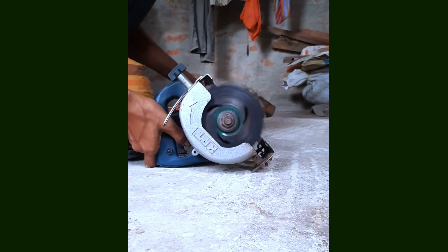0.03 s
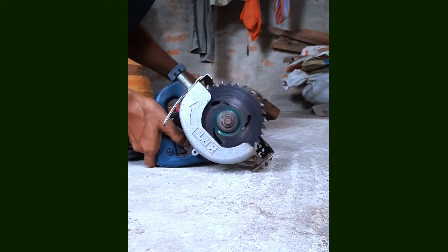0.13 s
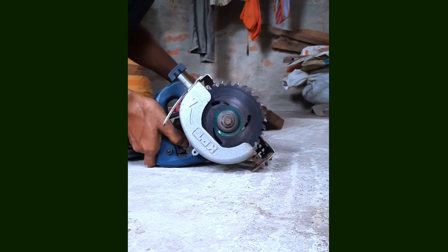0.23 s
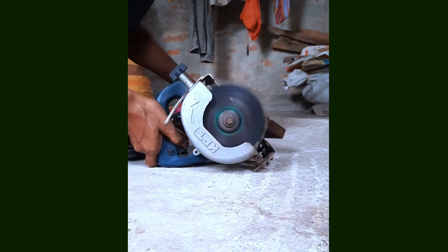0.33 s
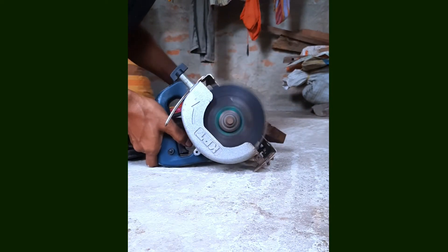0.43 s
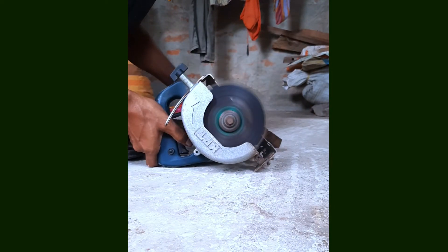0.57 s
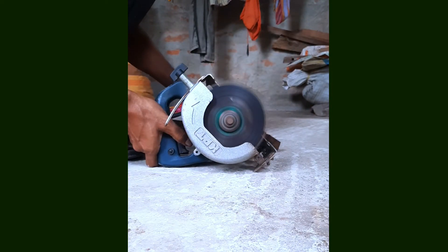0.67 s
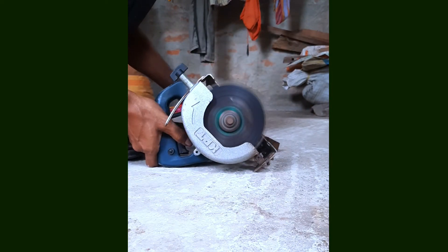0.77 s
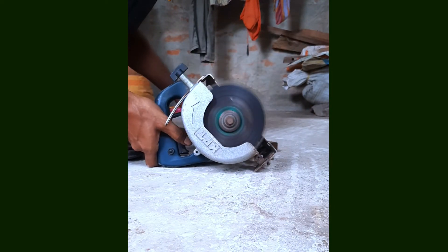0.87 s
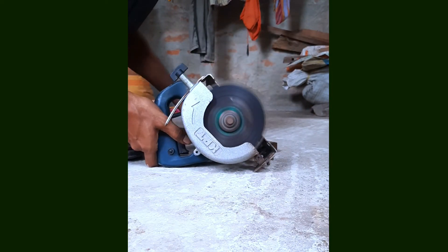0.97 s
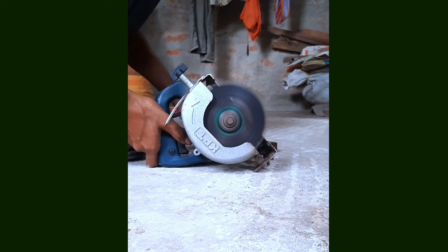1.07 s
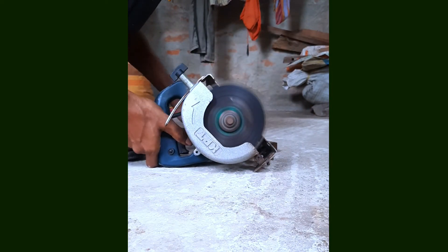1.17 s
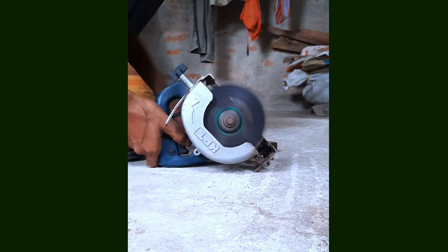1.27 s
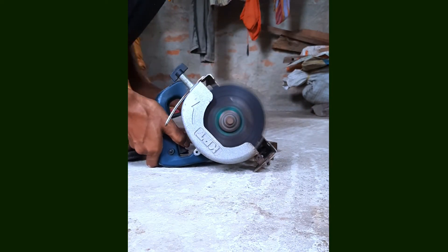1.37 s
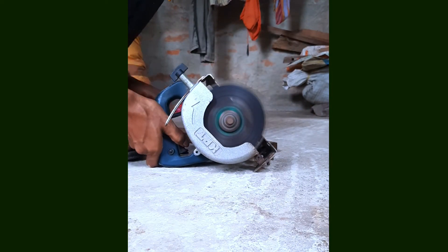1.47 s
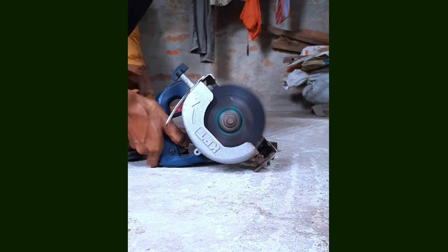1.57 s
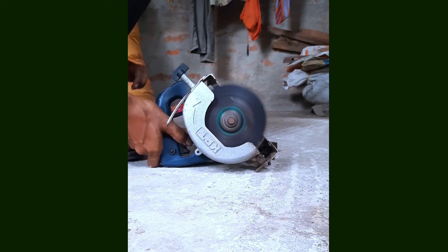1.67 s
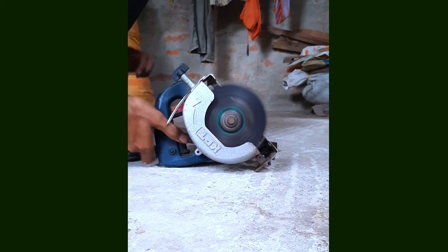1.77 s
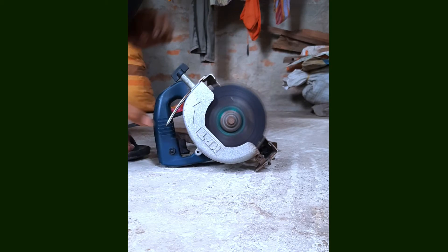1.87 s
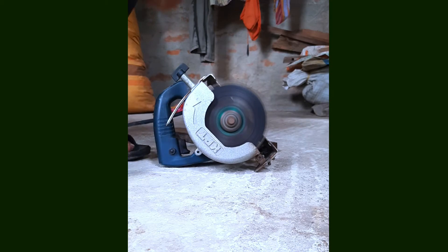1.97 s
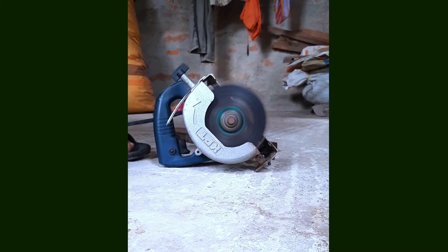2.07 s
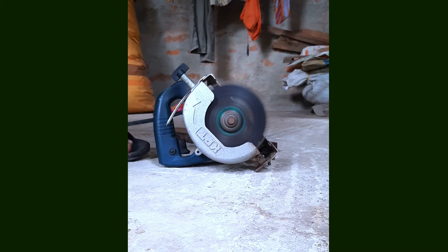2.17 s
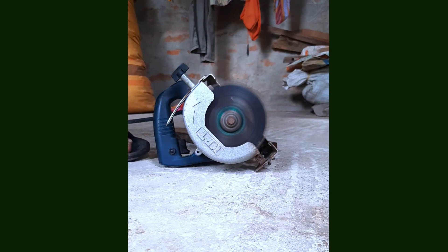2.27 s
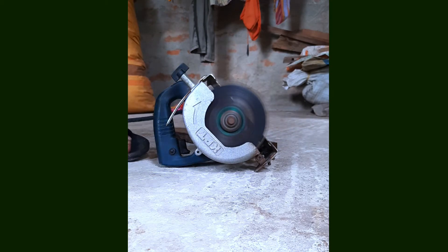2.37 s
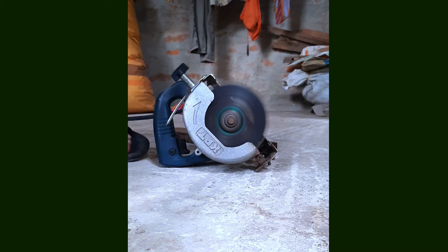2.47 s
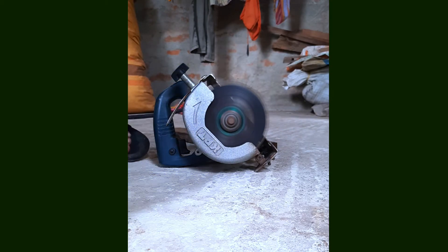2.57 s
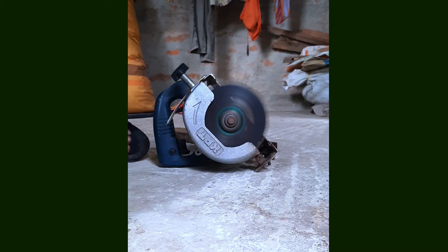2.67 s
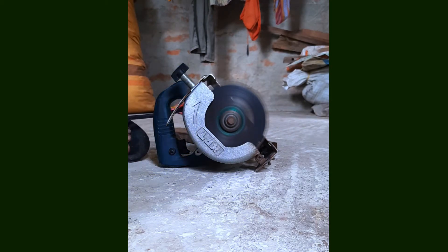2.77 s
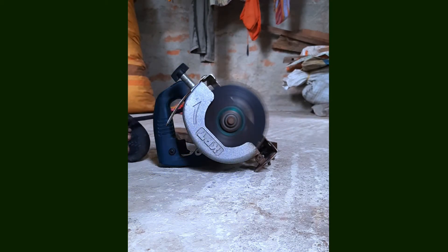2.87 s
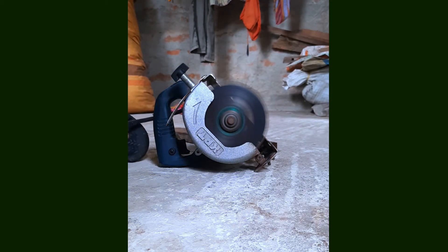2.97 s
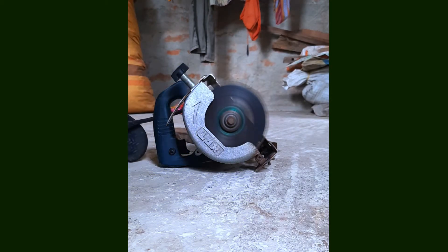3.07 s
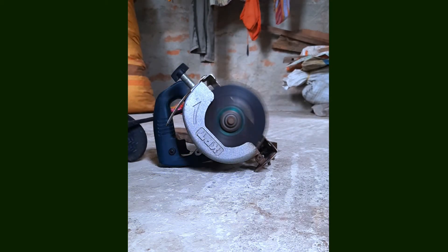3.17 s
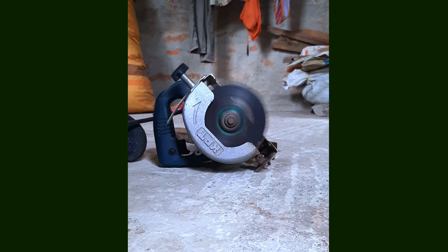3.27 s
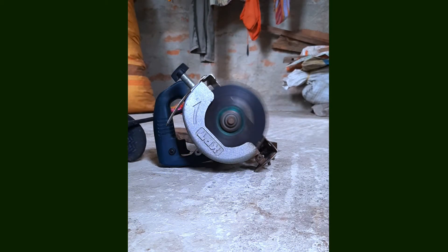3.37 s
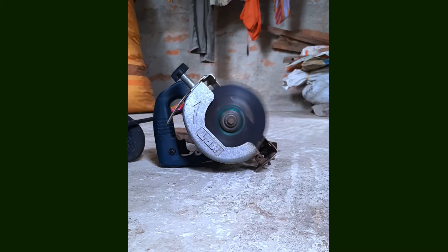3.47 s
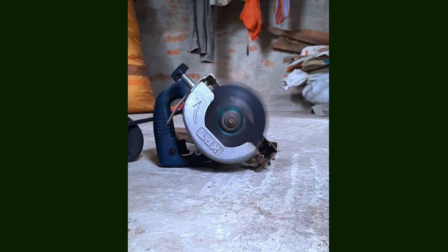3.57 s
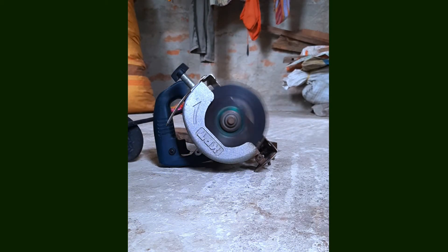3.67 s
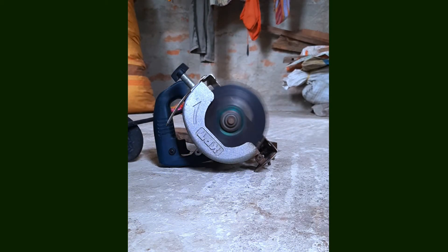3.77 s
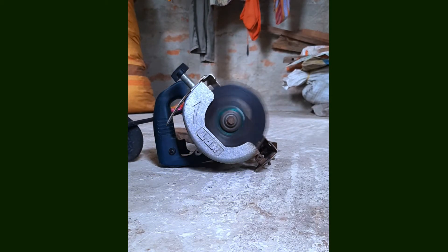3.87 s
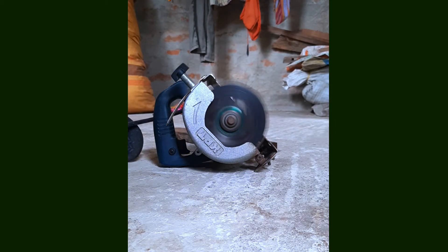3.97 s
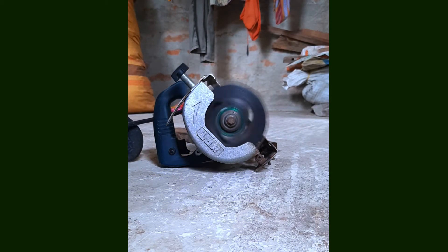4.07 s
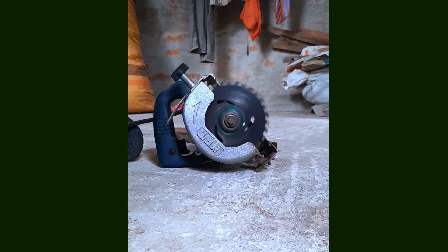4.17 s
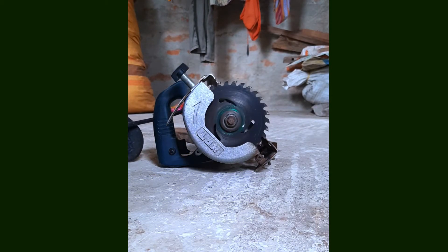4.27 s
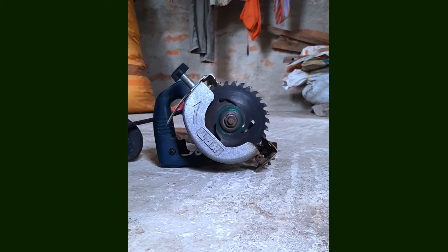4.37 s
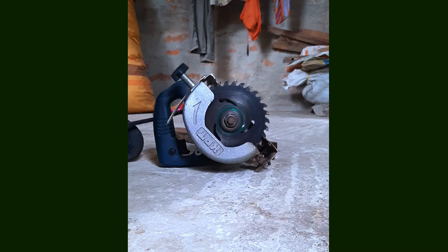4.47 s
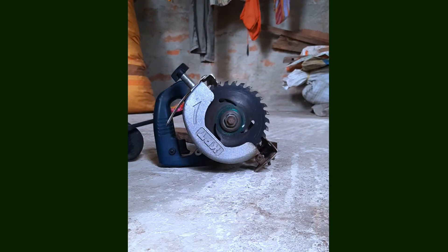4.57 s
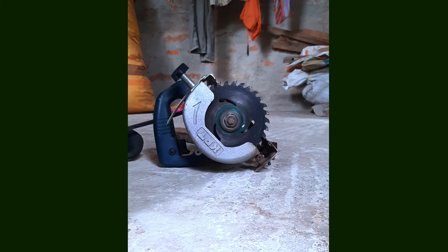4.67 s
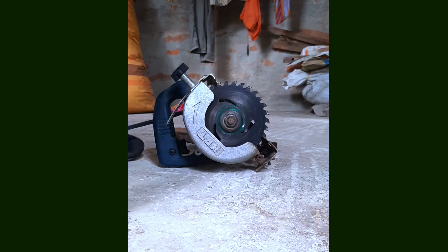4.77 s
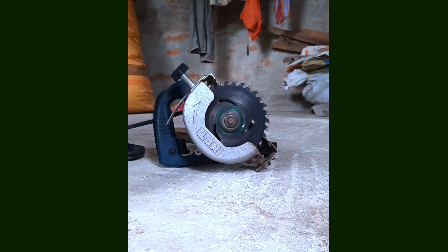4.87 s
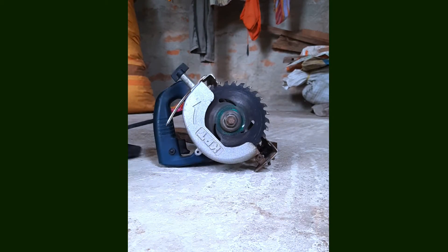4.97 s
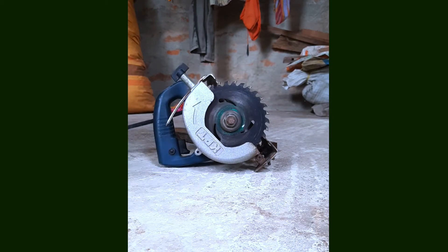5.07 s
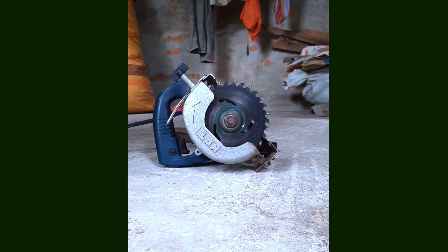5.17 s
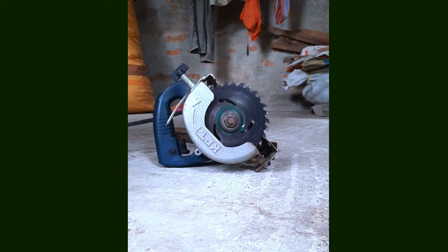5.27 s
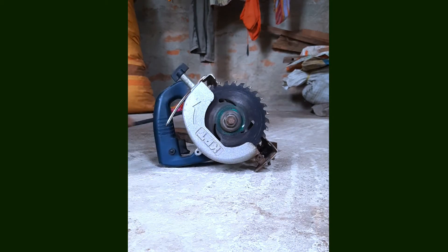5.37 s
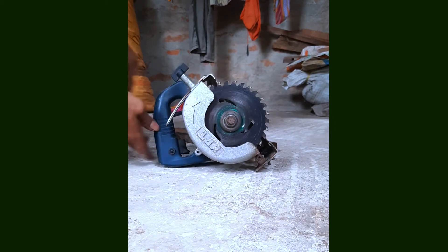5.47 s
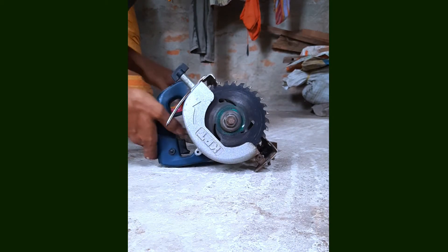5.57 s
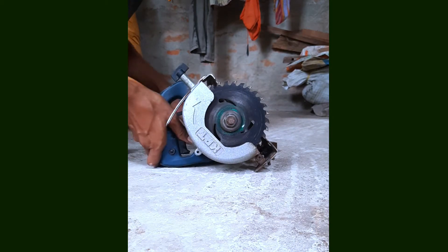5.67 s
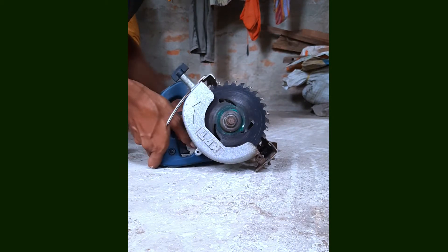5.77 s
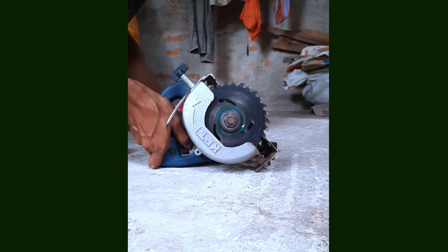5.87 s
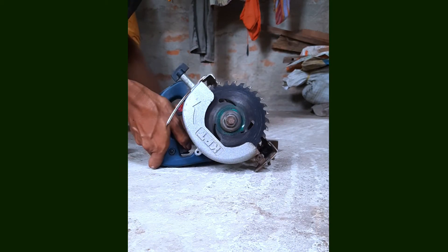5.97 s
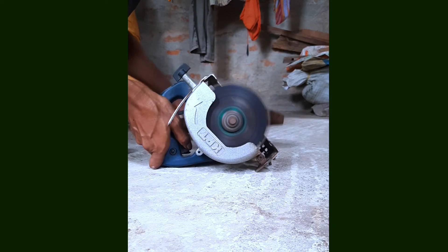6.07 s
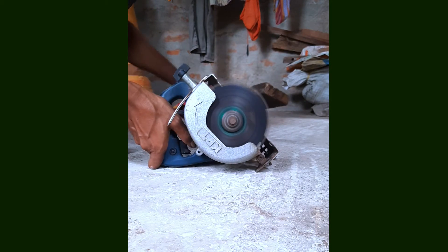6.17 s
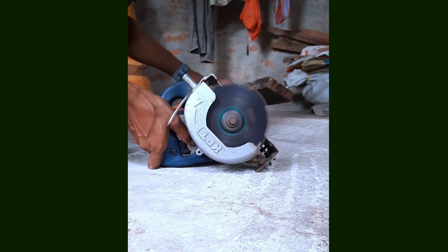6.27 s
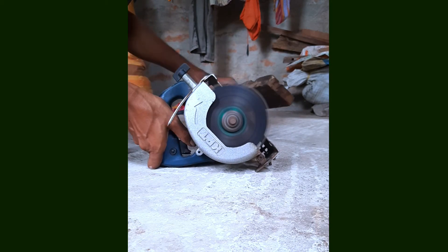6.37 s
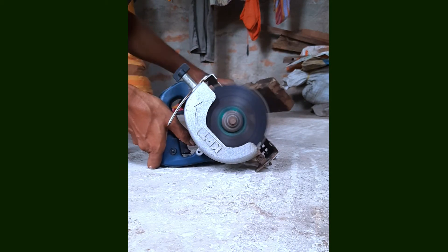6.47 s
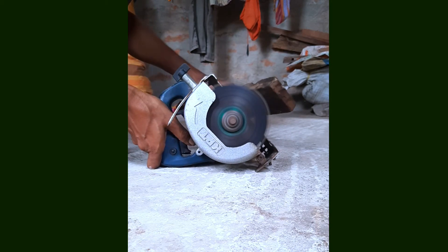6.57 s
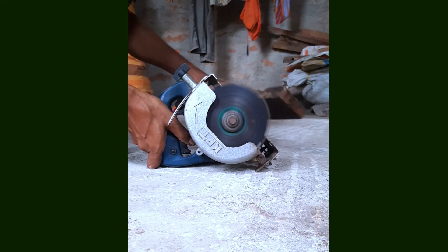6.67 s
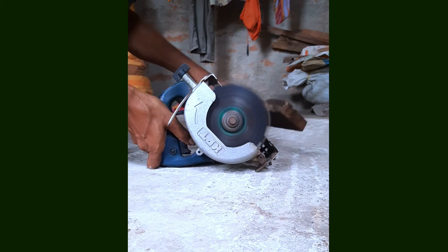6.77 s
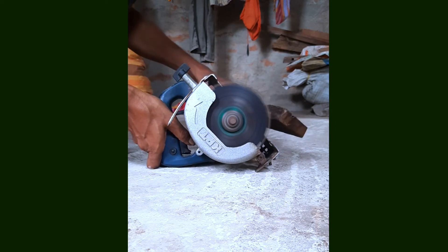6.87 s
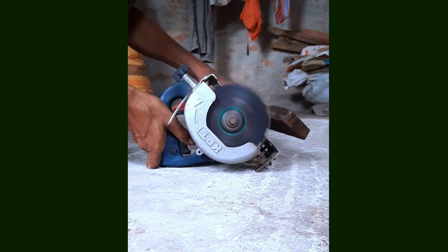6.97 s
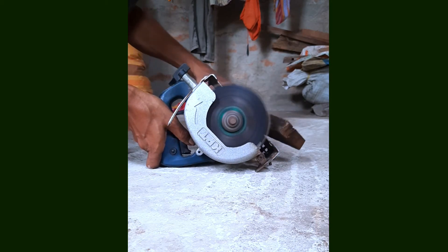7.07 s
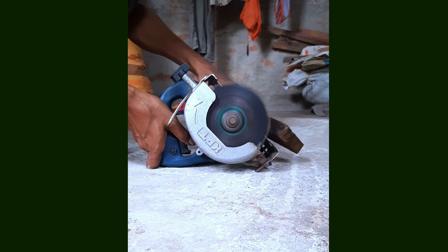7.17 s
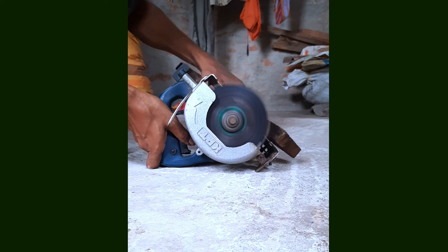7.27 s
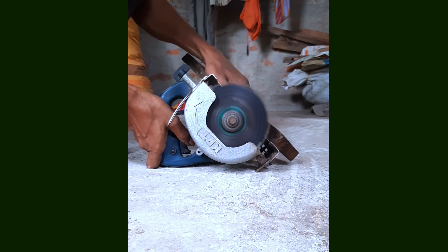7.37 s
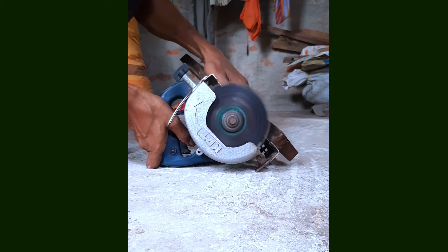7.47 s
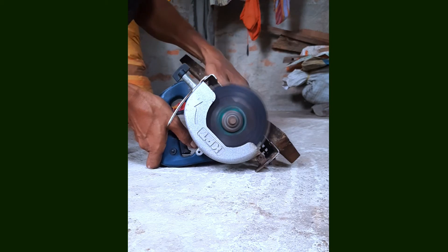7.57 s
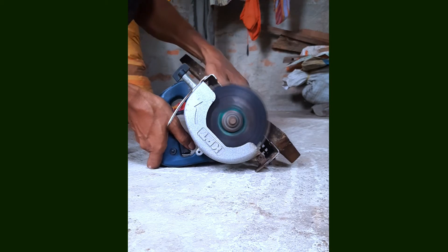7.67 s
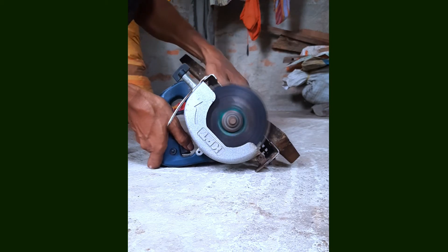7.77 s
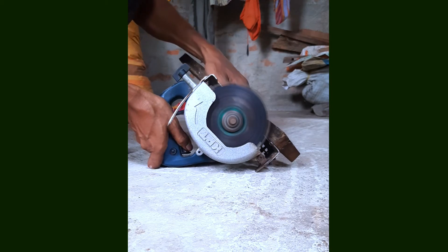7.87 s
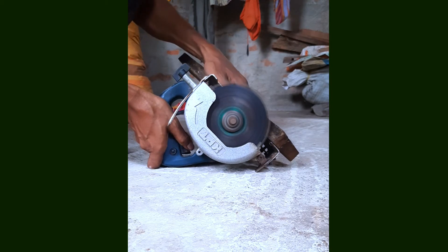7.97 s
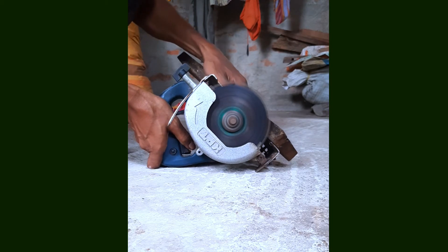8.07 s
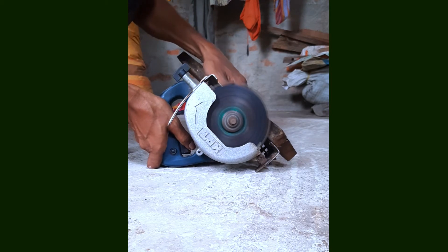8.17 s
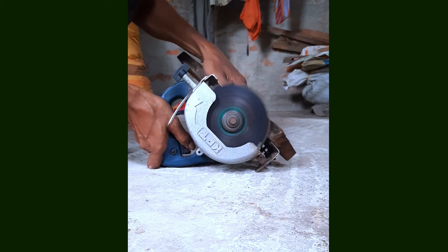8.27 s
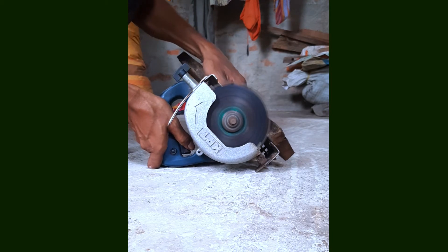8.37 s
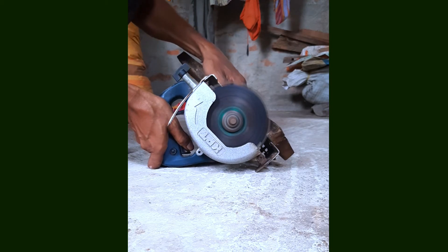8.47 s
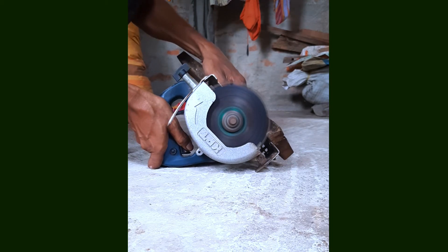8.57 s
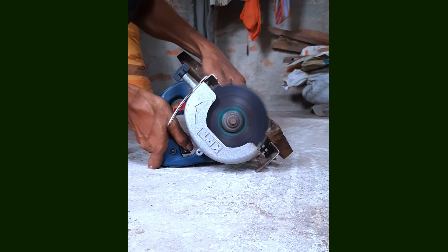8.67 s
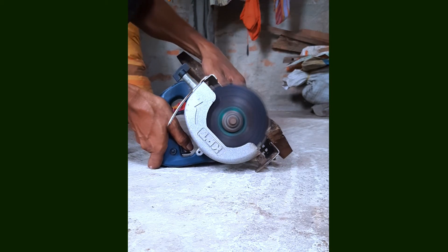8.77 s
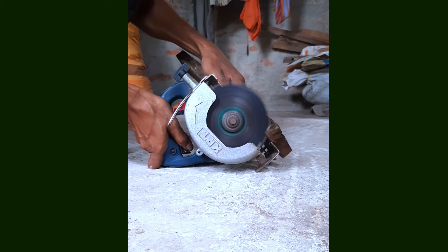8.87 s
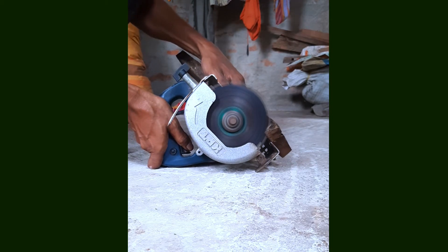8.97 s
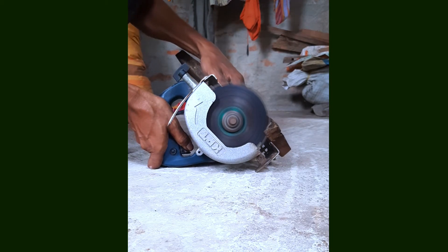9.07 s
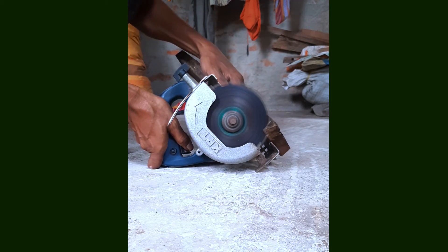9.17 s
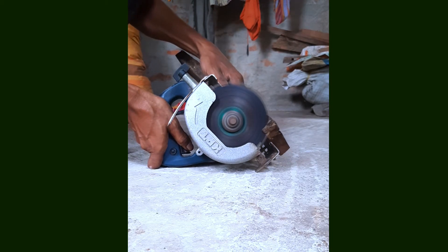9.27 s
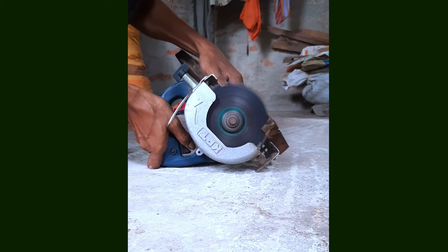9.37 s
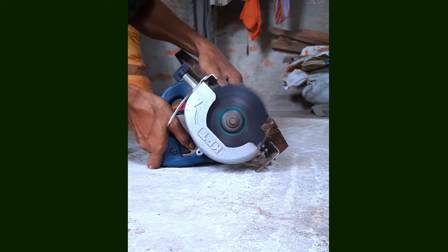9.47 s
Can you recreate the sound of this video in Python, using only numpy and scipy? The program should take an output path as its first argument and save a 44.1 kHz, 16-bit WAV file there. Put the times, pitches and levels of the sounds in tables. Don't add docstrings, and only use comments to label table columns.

```python
import sys
import numpy as np
from scipy import signal
from scipy.fft import rfft, irfft
from scipy.io import wavfile
from scipy.ndimage import uniform_filter1d, map_coordinates

SR = 44100
rng = np.random.default_rng(int(sys.argv[2]) if len(sys.argv) > 2 else 0)


def ratio_of_db(decibels):
    return 10 ** (np.asarray(decibels, float) / 20)


def log_audio(samples):
    frames = np.atleast_2d(samples).T
    limited = np.clip(frames, -1, 1)
    pcm = np.round(limited * 32767).astype(np.int16)
    wavfile.write(sys.argv[1], SR, pcm)


N = 419832
TIME_S = np.arange(N) / SR

# start in seconds, hold in seconds, first slam peak in dB, rattle trim in dB.
TRIGGER = [
    (0.3848, 0.027, -13, 1.5),
    (1.6601, 0.05, -12, 2.5),
    (6.0863, 0.047, -12.5, 1.4),
    (7.9569, 0.072, -7, 2),
]
# time in seconds, blade ring in dB, gear rattle in dB.
CUT = [
    (8.38, -58, -27),
    (8.436, -36, -33),
    (8.534, -29, -35),
    (8.62, -32.5, -47),
    (8.71, -29.5, -29.5),
    (8.834, -32.5, -31),
    (9.094, -33, -28.5),
    (9.3, -31.5, -30),
    (9.52, -34, -30),
]
# centre in Hz, width in Hz, lift in dB.
CASING_MODES = [(612, 58, 7), (1437, 14, 8), (1608, 15, 6.5), (1820, 24, 8.5), (2340, 85, -2.5),
                (2446, 19, 8.5), (2770, 60, 5), (3260, 18, -3), (4450, 320, 2.5)]
# frequency in Hz, level in dB.
BLADE = [(880, -16.5), (1500, -5), (2740, -5), (3030, -1.5), (4390, -8.5), (6360, -14), (8680, -7.5),
         (10500, -14), (14500, -10), (15500, -6), (16500, -97)]
CLIMB_S, BITE_S = .143, 8.46


def unit(x):
    return x / np.sqrt(np.mean(x ** 2))


def curves(table):
    s, *columns = np.transpose(table)
    return [np.interp(TIME_S, s, column) for column in columns]


def fenced(table):
    first, last = table[0], table[-1]
    return [(first[0] - .004, -110, *first[2:]), *table, (last[0] + .02, -110, *last[2:])]


def swells(events):
    power = 0
    for s, rise, fall, db in events:
        spans = np.where(TIME_S < s, (s - TIME_S) / rise, (TIME_S - s) / fall)
        power = power + ratio_of_db(db - 12 * spans) ** 2
    return np.sqrt(power)


def walk(rate):
    hold = int(SR / rate)
    steps = np.repeat(rng.standard_normal(N // hold + 1), hold)
    return 1.345 * uniform_filter1d(uniform_filter1d(steps, hold), hold)[:N]


def pair(alike_hz):
    mid, side = rng.standard_normal((2, N))
    low = signal.butter(2, alike_hz, "low", fs=SR, output="sos")
    high = signal.butter(2, alike_hz, "high", fs=SR, output="sos")
    return signal.sosfilt(low, mid) + signal.sosfilt(high, [mid, .15 * mid + side])


def grit(spread_db, hold):
    draws = np.minimum(rng.exponential(size=N // 24 + 1), 4)
    sizes = ratio_of_db(spread_db * np.repeat(draws, 24)[:N])
    return unit(pair(799) * signal.lfilter([1], [1, -min(hold, .99)], sizes))


def band(x, edges_hz):
    return unit(signal.sosfilt(signal.butter(2, edges_hz, "band", fs=SR, output="sos"), x))


def colour(x, points, modes=(), scale=1):
    hz = np.arange(8193) * SR / 16384 + 1
    point_hz, point_db = np.transpose(points)
    gain = ratio_of_db(scale * np.interp(np.log(hz), np.log(point_hz + 1), point_db))
    for centre, width, db in modes:
        gain = gain * np.sqrt(1 + (ratio_of_db(db) ** 2 - 1) / (1 + (2 * (hz - centre) / width) ** 2))
    cepstrum = irfft(np.log(gain + 1e-5))
    cepstrum[1:8192] *= 2
    cepstrum[8193:] = 0
    response = irfft(np.exp(rfft(cepstrum)))[None, :8192]
    return signal.fftconvolve(np.atleast_2d(x), response, axes=1)[:, :N]


def stack(hz, orders, flutter_db, rate):
    phase = 2 * np.pi * np.cumsum(hz) / SR
    return sum(ratio_of_db(db + flutter_db * walk(rate)) * np.cos(k * phase) for k, db in orders)


def ping(events, cycles, settle_hz=None):
    out = np.zeros(N + 4410)
    t = np.arange(4410) / SR
    for s, db, hz, *sign in events:
        end = min(settle_hz or hz, hz)
        turns = np.cumsum(end + (hz - end) * np.exp(-(2.1 * t * hz) ** 2)) / SR
        swing = np.sin(2 * np.pi * turns) * np.exp(-turns / cycles)
        start = int(s * SR)
        out[start:start + len(t)] += np.prod(np.sign(sign)) * ratio_of_db(db) * swing
    return out[:N]


def direct(x):
    port_lag_s = .00005
    return np.array([x, np.roll(x, int(port_lag_s * SR))])


def yard():
    # frequency in Hz, level in dB.
    yard_spectrum = [(15, -52), (30, -19), (87, -4), (220, -5.5), (349, -13.5), (809, -21.5), (1010, -13.5),
                     (1510, -18.5), (5720, -32), (9080, -40), (10400, -74), (14000, -39), (16500, -62)]
    # centre in Hz, width in Hz, lift in dB.
    yard_modes = [(4200, 72, 8)]
    lull_db, lull_s = -5, .5
    lull = lull_db * np.clip(2 - 2 * TIME_S / lull_s, 0, 1)
    return ratio_of_db(-49.5 + lull + walk(2.3)) * unit(colour(pair(1360), yard_spectrum, yard_modes))


def engines():
    # multiple of the cycle rate, level in dB.
    idle_orders = [(4, -1), (5, -16), (6, -4.5), (7, -32), (10, -33), (12, -13.5)]
    pump_orders = [(4, -9), (5, 0.5), (6, 1.5), (7, -20), (8, -6.5), (9, -3.5)]
    # peak time in seconds, rise in seconds, fall in seconds, peak in dB.
    idle_surges = [
        (.08, .2, .3, -53),
        (.95, 0.49, 0.48, -47.5),
        (1.62, 0.38, 0.15, -37.5),
        (2.56, 0.31, 0.24, -47),
        (3.05, 0.23, 0.31, -47),
        (3.75, 0.46, 0.34, -46),
        (4.26, 0.3, 0.18, -55),
    ]
    pump_surges = [
        (5.2, 0.69, 0.17, -47),
        (5.9, 0.57, 0.32, -42),
        (6.72, 0.21, 0.54, -47),
        (7.26, .15, 0.43, -43),
        (7.86, 0.45, 0.33, -41.5),
        (8.29, 0.1, 0.17, -47),
    ]
    start_hz, idle_hz, settle_s, pump_hz = 17.6, 19.4, 1.3, 28.88
    rising_hz = np.interp(TIME_S, [0, settle_s], [start_hz, idle_hz])
    idle = unit(stack(rising_hz * (1 + .006 * walk(1.5)), idle_orders, 2.5, rate=3))
    pump = unit(stack(pump_hz * (1 + 0.00362 * walk(1.3)), pump_orders, 1.0, rate=3.14))
    throb = swells(idle_surges) * idle + swells(pump_surges) * pump
    return throb * ratio_of_db(np.array([[1.2], [-1.2]]))


def vehicle():
    # frequency in Hz, level in dB.
    road = [(120, -28), (200, -3), (293, -7.5), (377, -5), (626, -12.5), (749, -0.5), (2500, -19),
            (3250, -66), (5500, -120)]
    # peak time in seconds, rise in seconds, fall in seconds, peak in dB.
    passes = [
        (4.62, .1, 0.34, -58),
        (4.94, 0.28, .12, -46.5),
        (5.16, 0.13, 0.92, -50.5),
        (5.8, 0.38, 0.8, -52.5),
    ]
    return unit(colour(pair(850), road)) * swells(passes)


def handling():
    # frequency in Hz, level in dB.
    rub_spectrum = [(290, -30), (500, -13), (731, -4), (1090, -4.5), (1810, 2), (3300, -3.5), (8300, -12),
                    (10400, -22), (13500, -14), (15800, -14), (16500, -59)]
    # peak time in seconds, rise in seconds, fall in seconds, peak in dB.
    rubs = [
        (4.76, 0.16, 0.46, -57),
        (4.84, .03, .06, -62),
        (5.085, .03, .05, -52),
        (5.15, 0.44, 1, -54),
        (5.562, 0.022, 0.39, -44),
        (5.768, 0.0058, 0.047, -37.5),
        (5.83, 0.053, 0.15, -40.5),
    ]
    # time in seconds, peak in dB, pitch in Hz.
    taps = [
        (4.828, -36, 730),
        (4.829, -33, 6000),
        (5.211, -28, 855),
        (5.213, -26, 1400),
        (6.04, -36, 950),
        (5.558, -38, 1820),
        (5.767, -18, 2620),
        (5.772, -32, 1840),
        (5.814, -32, 1860),
    ]
    let_go_db = -10 * np.clip((TIME_S - 6.0) / .02, 0, 1)
    rub = unit(colour(grit(2.8, hold=0.59), rub_spectrum, CASING_MODES)) * swells(rubs) * ratio_of_db(let_go_db)
    return rub + ratio_of_db(-8.0) * direct(ping(taps, cycles=1.9))


def chips():
    # time in seconds, peak in dB, pitch in Hz.
    hits = [(8.552, -16.5, 129), (8.5905, -14.5, 278), (8.6694, -13, 118), (8.681, -14, 103),
            (8.698, -12, 470), (8.7187, -12, 279), (8.729, -20, 380), (8.7645, -14, 311),
            (8.7873, -25, 154), (8.81, -9, 300), (8.8303, -8, 408), (8.844, -13, 110), (8.8587, -5, 735),
            (8.871, -11, 525), (8.9135, -8, 298), (8.945, -13, 350), (9.022, -16.5, 130),
            (9.1284, -8.5, 213), (9.2375, -15, 357), (9.279, -21, 166), (9.3035, -8.5, 647),
            (9.312, -20, 190), (9.335, -13, 459), (9.3463, -10.5, 401)]
    puff_hz = 150
    signed = [(s, db, hz, puff_hz - hz) for s, db, hz in hits]
    return ping(signed, cycles=0.21, settle_hz=84) * ratio_of_db(np.array([[3.0], [-16.0]]))


def speed():
    top_rates = [2960, 3225, 3140, 3280]
    start_hz, friction_hz_per_s, drag_per_s = 260, 920, .243
    brake_hz_per_s, loaded_hz = 550, 2350
    rest = friction_hz_per_s / drag_per_s

    def coast(top, since):
        return np.maximum((top + rest) * np.exp(-drag_per_s * since) - rest, 0)

    hz = coast(start_hz, TIME_S)
    for (on, *_), top in zip(TRIGGER, top_rates):
        climb = np.interp(TIME_S, [on, on + CLIMB_S], [hz[int(on * SR)], top])
        after = np.where(TIME_S < on + CLIMB_S, climb, coast(top, TIME_S - on - CLIMB_S))
        hz = np.where(TIME_S < on, hz, after)
    braked = np.maximum(hz - brake_hz_per_s * (TIME_S - BITE_S), loaded_hz)
    return np.where(TIME_S < BITE_S, hz, braked)


def load():
    return np.clip((TIME_S - BITE_S - .13) / .08, 0, 1)


def noise_levels(hz):
    # mesh rate in Hz, rattle in dB, air in dB re rattle.
    by_speed = [(0, -91, 11.5), (130, -56.5, -23), (324, -48.5, -15.5), (730, -41.5, -10.5),
                (1130, -40, -9), (1690, -38.5, -7.5), (2480, -34, -9.5), (3200, -30.5, -8)]
    power_db, fade_db_per_s = -23, 66
    settle_s, settle_db_per_s = 0.12, 150
    rate, rattle_law, air_law = np.transpose(by_speed)
    coasting_db = np.interp(hz, rate, rattle_law)
    rattle_db = coasting_db
    power = np.zeros(N)
    for on, held, _, trim_db in TRIGGER:
        rattle_db = np.where(TIME_S >= on, coasting_db + trim_db, rattle_db)
        released_db = fade_db_per_s * np.maximum(TIME_S - on - held, 0)
        settled_db = settle_db_per_s * np.maximum(TIME_S - on - settle_s, 0)
        power += (TIME_S >= on) * ratio_of_db(power_db - released_db - settled_db)
    loaded = load()
    cutting_db = (1 - loaded) * rattle_db + loaded * curves(CUT)[1]
    rattle_db = np.where(TIME_S < CUT[0][0], rattle_db, cutting_db)
    return np.hypot(ratio_of_db(rattle_db), power), np.interp(hz, rate, air_law) + 3.5 * loaded


def tone_levels(hz):
    # mesh rate in Hz, mesh tone in dB, overtones in dB.
    whine_law = [(0, -40, -82), (650, -4, -55), (1100, 0, -51), (1600, 0, -48), (2150, 0, -52),
                 (2680, 0, -45), (3280, 0, -47)]
    powered_db, bite_db, loaded_db, overtones_powered_db = -15, 3, -20, -1
    rate, tone_law, overtone_law = np.transpose(whine_law)
    climbing = sum(((TIME_S >= on) & (TIME_S < on + CLIMB_S)).astype(float) for on, *_ in TRIGGER)
    load_db = loaded_db * load()
    tone_db = np.interp(hz, rate, tone_law) + powered_db * climbing + bite_db * (TIME_S > CUT[0][0]) + load_db
    overtone_db = np.interp(hz, rate, overtone_law) + overtones_powered_db * climbing + load_db
    return tone_db, overtone_db


def hum():
    start_hz, climb_hz_per_s = 190, 600
    since = TIME_S - np.array([on for on, *_ in TRIGGER])[:, None]
    since = np.where(since >= 0, since, 9).min(axis=0)
    gate = uniform_filter1d(np.clip(1.6 - 1.6 * since / CLIMB_S, 0, 1), size=600)
    hz = start_hz + climb_hz_per_s * np.minimum(since, CLIMB_S)
    return ratio_of_db(-43.5) * gate * stack(hz, [(1, -6), (2, 0)], 2.5, rate=30)


def brush_hiss(hz):
    # frequency in Hz, level in dB.
    brushes = [(10500, -49), (13000, -13), (14500, 6), (15800, -6), (16500, -78)]
    return ratio_of_db(-60.5) * np.clip(hz / 150 - .2, 0, 1) * unit(colour(pair(900), brushes))


def fan_air(air_db):
    # frequency in Hz, level in dB.
    air = [(3240, -24), (5500, 0), (6550, -4.5), (7690, -2), (10500, -13.5), (13900, -2.5), (14700, -8.5),
           (15900, -4.5), (16500, -63)]
    return ratio_of_db(air_db + 1.54) * unit(colour(grit(4.8, hold=1.0), air))


def whine(hz, overtone_db):
    # multiple of the mesh rate, level in dB.
    overtones = [(2, 0), (3, -7), (4, -4), (5, -8), (6, -3), (7, -5)]
    # multiple of the rotor rate, level in dB.
    rotor_orders = [(11, -10), (13, -12), (15, -12), (16, -4), (17, -5), (18, -8), (19, -2), (20, -8),
                    (21, -12), (23, -9), (25, -9)]
    # frequency in Hz, level in dB.
    guard = [(900, -30), (1600, -10), (2300, -1), (3150, 1), (3700, -8), (4400, 0), (5200, -5), (6200, -20),
             (9000, -40)]
    pinion_teeth = 12
    multiples = stack(hz * (1 + .001 * walk(40)), overtones, 2.5, rate=35)
    rotor = stack(hz / pinion_teeth * (1 + 0.007 * walk(120)), rotor_orders, 3, rate=45)
    return ratio_of_db(overtone_db + 5) * colour(multiples + rotor, guard)[0]


def mesh():
    # mesh rate in Hz, level in dB.
    mesh_path = [(600, -64), (950, -55), (1150, -50), (1450, -46), (1650, -54), (1900, -53), (1990, -40),
                 (2090, -43), (2160, -38), (2290, -44), (2400, -30), (2450, -30), (2500, -36), (2580, -44),
                 (2680, -35), (2730, -31), (2810, -33), (2875, -42), (2940, -28), (3000, -37), (3030, -33),
                 (3075, -43), (3130, -28), (3200, -35), (3280, -41)]
    hz = speed()
    tone = stack(hz * (1 + .0008 * walk(25)), [(1, 0)], 1.6, rate=40)
    path_db = np.interp(hz, *np.transpose(mesh_path))
    return direct(ratio_of_db(path_db + tone_levels(hz)[0]) * tone)


def slams():
    # time in seconds, peak in dB, pitch in Hz.
    impacts = [(0.3845, -12, 2480), (0.3893, -18, 1700), (0.3974, -11, 2600), (0.4063, -17, 2060),
               (0.412, -22, 1820), (0.4168, -11, 2700), (0.4265, -17, 2150), (0.4334, -13, 4440),
               (0.4416, -15, 2410), (0.4498, -19, 1830), (0.4607, -13, 3700), (0.4735, -16, 3730),
               (0.4982, -17, 4240), (0.5105, -18, 4220), (1.6597, -11, 2380), (1.6688, -10, 2500),
               (1.6779, -10.5, 2070), (1.6867, -13, 2670), (1.6968, -16, 2520), (1.7016, -17, 2430),
               (1.7109, -19, 2450), (1.7211, -20, 2450), (1.7264, -14, 3600), (1.7367, -14, 4460),
               (1.7457, -14, 3600), (1.7533, -16, 3600), (1.7617, -25, 1770), (1.7745, -25, 2480),
               (6.087, -9, 2560), (6.0954, -16, 1830), (6.1049, -11.5, 2480), (6.1142, -14, 2530),
               (6.1228, -17, 2480), (6.1314, -16, 2130), (6.1399, -18, 2450), (6.1474, -15, 2560),
               (6.1544, -14, 3300), (6.1659, -17, 3500), (6.1955, -19, 2450), (6.2004, -21, 2800),
               (6.2072, -19, 2330), (6.2121, -22, 1830), (7.9655, -12.5, 1710), (7.9735, -11.5, 2400),
               (7.9822, -12, 4410), (7.9935, -17, 2200), (7.9992, -11, 2840), (8.0089, -14, 2690),
               (8.0165, -16, 2430), (8.0256, -18, 2730), (8.0301, -12, 3550), (8.036, -13, 4410),
               (8.0433, -17, 4330), (8.0593, -19, 4460), (8.0682, -12, 4390), (8.0791, -15, 4520)]
    last_on, _, last_db, _ = TRIGGER[-1]
    events, steady = [], np.ones(N)
    for s, db, hz in [(last_on, last_db - 6, 2300), *impacts]:
        events += [(s, db - 1.2, hz), (s, db - 8.5, 4400), (s + 0.001575, db - 14.5, 1850)]
    for on, held, *_ in TRIGGER:
        start, stop = int(on * SR), int((on + held) * SR)
        steady[start:stop] = np.linspace(.35, 1, stop - start)
    casing = signal.butter(2, 900, "high", fs=SR, output="sos")
    return signal.sosfilt(casing, ping(events, cycles=4.36)), steady


def gear_rattle(hz):
    # frequency in Hz, level in dB.
    casing = [(150, -46.5), (250, -14.5), (437, -7), (531, -9.5), (602, -5), (902, -2), (2390, -3.5),
              (3300, -6), (4300, -6), (7000, -22.5), (9100, -38), (15400, -120)]
    rattle = unit(colour(grit(2.0, hold=0.83), casing, CASING_MODES))
    body = signal.sosfiltfilt(signal.butter(2, 1000, fs=SR, output="sos"), rattle)
    after_pull = swells([(on, 1e-4, .5, -6) for on, *_ in TRIGGER]).clip(0, .9)
    lost = np.maximum(np.clip(1.2 - hz / 2000, 0, .7), after_pull)
    return rattle - lost * body


def chatter(rattle, steady):
    # onset in seconds, peak in dB.
    knocks = [(1.0046, -32), (1.055, -35), (1.11, -37), (1.1533, -42), (1.2011, -35), (1.2585, -37),
              (1.32, -34), (2.3808, -35), (2.4341, -35), (2.494, -34), (2.54, -33), (2.5823, -34),
              (2.6668, -40), (6.8132, -38), (6.87, -34), (6.9289, -33), (6.9888, -34), (7.0561, -34),
              (7.1155, -35), (7.1644, -46), (7.2577, -48)]
    rise_s, fall_s = 0.0056, 0.0091
    bursts = swells([(s + rise_s, rise_s, fall_s, db) for s, db in knocks])
    low = ratio_of_db(2.5) * band(rattle, [2000, 3180]) * bursts
    surges = swells([(on, 0.05, 0.0347, -40.5) for on, *_ in TRIGGER])
    started = TIME_S > TRIGGER[0][0]
    return low + band(rattle, [3260, 4940]) * surges * started * steady ** 3


def gripped_ring(strikes):
    # centre in Hz, width in Hz, lift in dB.
    gripped_modes = [(12130, 66, 19.5), (14200, 70, 20.5)]
    climb_per_s, centre_s = .03, 9.05
    drift = climb_per_s / 2 * ((TIME_S - centre_s) ** 2 - .5) * SR
    warped = np.arange(N) + drift + 5 * walk(8)
    ring = colour(strikes, BLADE, gripped_modes) - colour(strikes, BLADE)
    return [map_coordinates(channel, [warped], order=3, mode="mirror") for channel in ring]


def blade():
    # centre in Hz, width in Hz, lift in dB.
    blade_modes = [(2500, 45, 5), (3390, 30, 7.5), (3800, 32, 9), (2720, 140, 10), (4350, 50, 13),
                   (4770, 55, 9), (5830, 140, 10), (7400, 270, 11), (8760, 250, 9.5), (9830, 50, 16),
                   (11600, 100, 10), (13500, 100, 7), (15200, 60, 9), (3610, 40, 8.5)]
    # pitch in Hz, time in seconds, fade in seconds, level in dB.
    flare_events = [(2807, 8.62, .25, -35), (2820, 8.98, .07, -37), (2473, 8.7, 0.28, -40.5),
                    (2735, 9.1, 0.088, -41), (2718, 9.37, .2, -35.5), (2730, 9.5, 0.071, -38),
                    (2770, 8.75, 0.11, -42), (3620, 8.45, .06, -34), (3270, 7.8, 0.056, -36),
                    (4350, 8.7, .22, -37.5), (4300, 9.05, .2, -46), (4365, 9.45, .12, -36),
                    (13550, 8.54, .1, -42), (13600, 8.67, .15, -38), (14285, 9.37, .3, -39),
                    (3300, 8.8, 0.073, -35), (1253, 9.42, 0.18, -38.5), (15150, 8.8, .3, -42),
                    (12020, 8.87, .08, -47)]
    strikes = grit(2.6, hold=0.9)
    hiss = colour(strikes, BLADE)
    ringing = hiss
    for k in range(3):
        group = colour(strikes, BLADE, blade_modes[k::3]) - hiss
        ringing = ringing + ratio_of_db(1.7 * walk(16)) * group
    grip_db = np.clip(22 * (TIME_S - 8.9), -8, 0)
    ringing = ringing + ratio_of_db(grip_db + 1.1 * walk(11)) * gripped_ring(strikes)
    flares = 0
    for hz, s, fade, db in flare_events:
        mode = unit(signal.lfilter(*signal.iirpeak(hz, 220, fs=SR), strikes))
        flares = flares + swells([(s, fade, fade, db)]) * mode
    cutting = ratio_of_db(4.5 + 0.98 * walk(30)) * unit(ringing) + ratio_of_db(35.5) * flares
    return ratio_of_db(curves(fenced(CUT))[0]) * cutting


def saw():
    hz = speed()
    shake, air_db = noise_levels(hz)
    overtone_db = tone_levels(hz)[1]
    wobble = 1 + 0.098 * np.sin(2 * np.pi * np.cumsum(hz / 36) / SR)
    slam, steady = slams()
    drive = shake * ratio_of_db(0.77 * walk(14)) * steady
    rattle = gear_rattle(hz)
    noise = drive * (wobble * rattle + fan_air(air_db)) + chatter(rattle, steady) + brush_hiss(hz) + blade()
    return noise + direct(whine(hz, overtone_db) + slam + hum())


def shed(x):
    # frequency in Hz, left minus right in dB.
    ports = [(60, -13), (110, 13), (200, 4.5), (380, 1), (700, 6), (1290, 5), (2380, -2.5), (4400, 0.5),
             (6500, -2), (9000, 3), (12000, 6.5), (15000, -2)]
    t60_s, echo_db = 0.33, -4
    t = np.arange(SR // 2) / SR
    echo = pair(2150)[:, :len(t)] * np.exp(-np.log(1000) * t / t60_s) * (t > .003)
    echo = ratio_of_db(echo_db) * echo / np.sqrt(np.sum(echo[0] ** 2))
    wet = x + signal.fftconvolve(x.mean(axis=0)[None], echo, axes=1)[:, :N]
    return np.vstack([colour(wet[0], ports, scale=.5), colour(wet[1], ports, scale=-.5)])


def scene():
    inside = shed(ratio_of_db(1.5) * (vehicle() + handling() + saw()))
    return yard() + engines() + inside + mesh() + chips()


def roll_off(x):
    return signal.sosfilt(signal.butter(12, 15650, fs=SR, output="sos"), x)


def record(dry):
    mix = signal.sosfilt(signal.butter(3, 55, "high", fs=SR, output="sos"), dry)
    return roll_off(mix)


dry = scene()
out = record(dry)
log_audio(out)
```